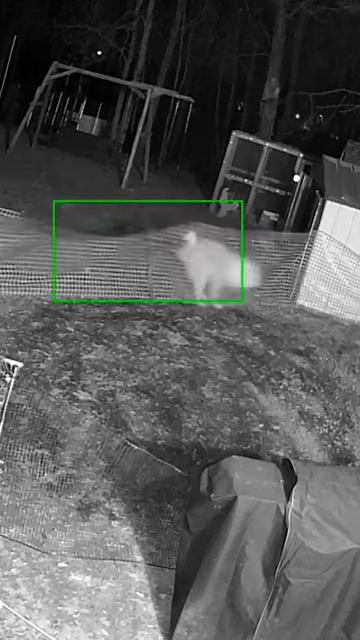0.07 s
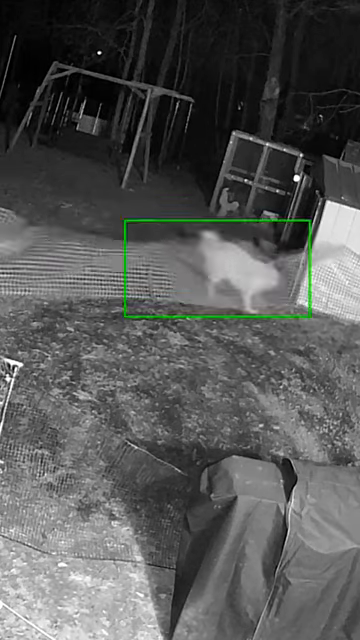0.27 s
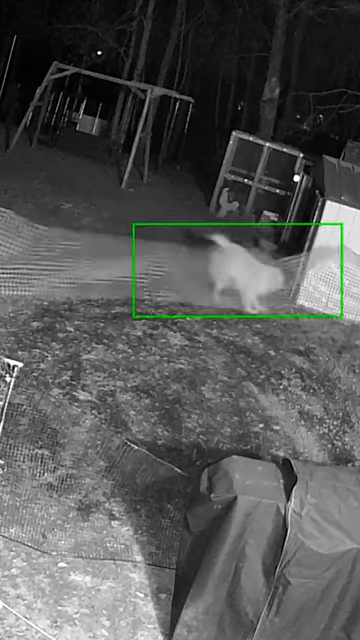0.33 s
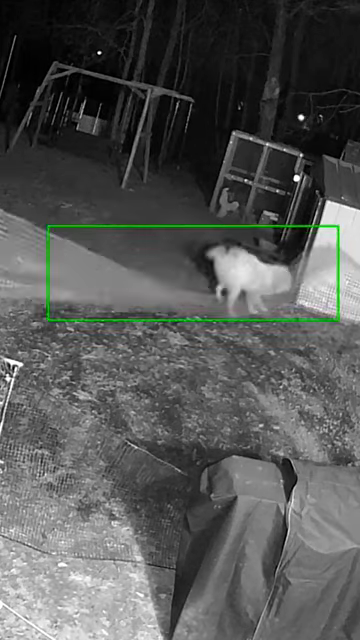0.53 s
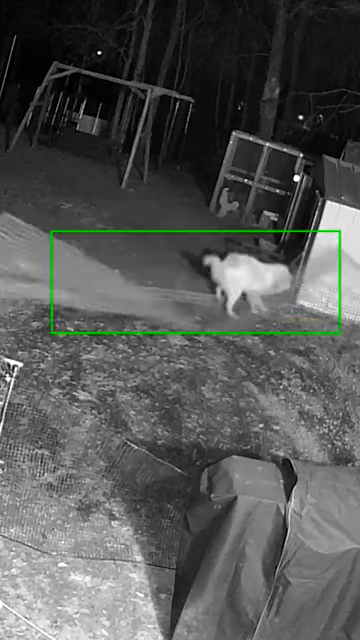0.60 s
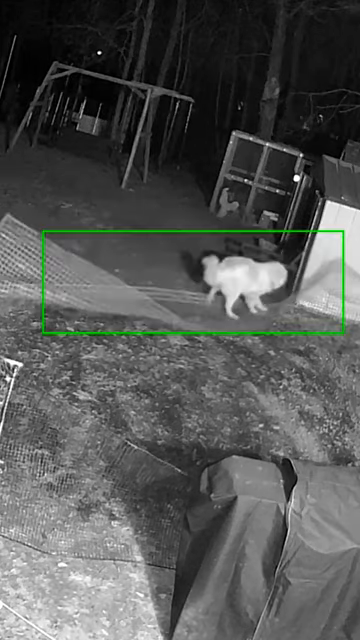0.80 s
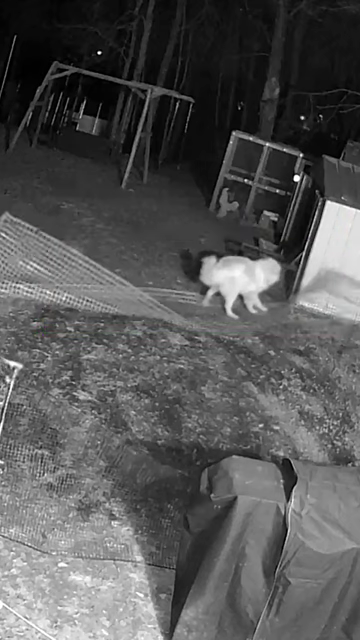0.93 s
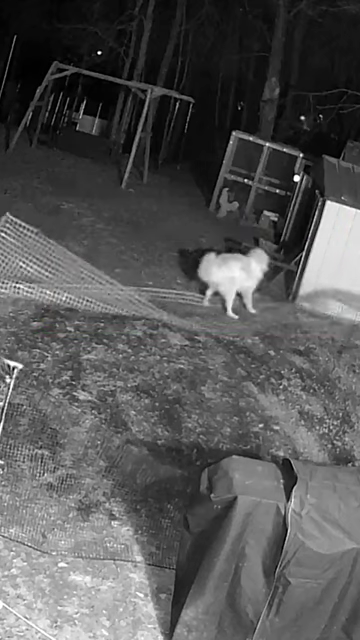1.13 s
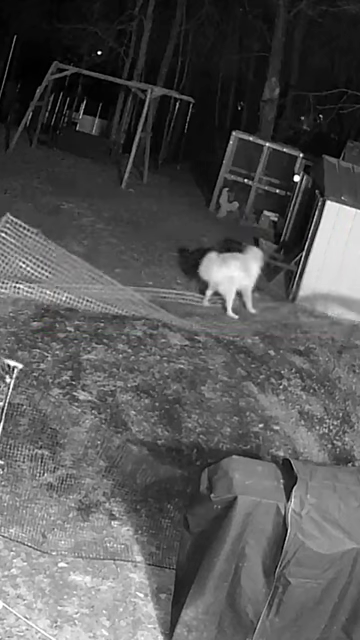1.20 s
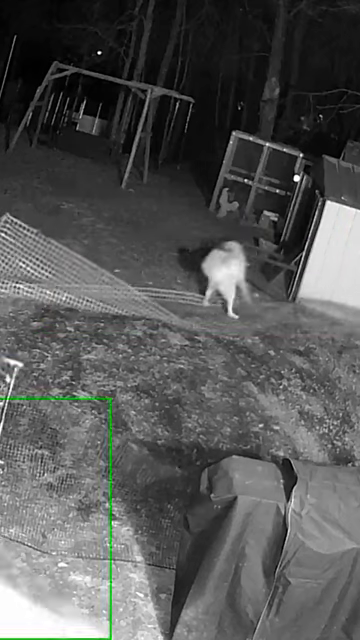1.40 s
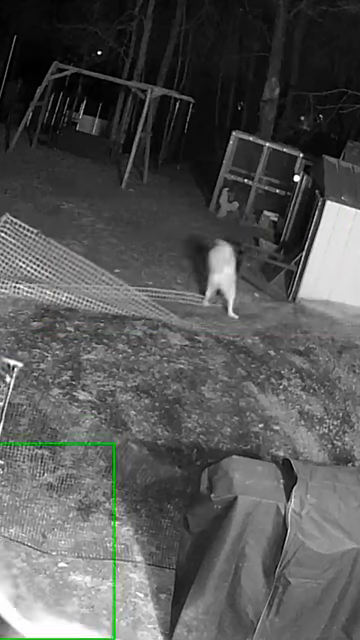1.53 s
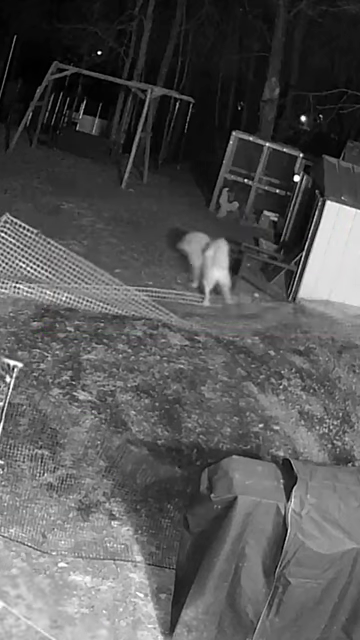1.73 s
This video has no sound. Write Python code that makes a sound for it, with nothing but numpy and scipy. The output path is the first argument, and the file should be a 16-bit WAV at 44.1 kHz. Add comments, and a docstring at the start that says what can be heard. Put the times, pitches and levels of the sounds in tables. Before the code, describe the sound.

Mesh fence booms and rattles twice as a dog hits it, over faint hiss.

```python
"""A large dog crashes twice into a temporary mesh fence in a yard at night.
Each crash is a few dull thumps (damped pulses), a hollow boom (the free vibration of the fence) and a
dense rattle (countless clicks in the mesh) that swells and dies away. The fence rebounds and scrapes,
the trees scatter back a soft echo, and the dog pads off over faint hiss. Nearby surfaces colour all but
the thumps and booms, and a security camera hears the scene through its band-limited microphone."""
import sys
import numpy as np
from scipy import signal
from scipy.fft import rfft, irfft, next_fast_len
from scipy.io import wavfile
from scipy.ndimage import uniform_filter1d, map_coordinates

SR = 44100
rng = np.random.default_rng(int(sys.argv[2]) if len(sys.argv) > 2 else 0)


def bounce(signal):
    """Save signal as a 16-bit WAV file at the path given by the first command-line argument."""
    frames = np.transpose(np.atleast_2d(signal))
    limited = np.clip(frames, -1, 1)
    pcm = np.round(limited * 32767).astype(np.int16)
    wavfile.write(sys.argv[1], SR, pcm)


N = 77175


def thumps():
    """Damped oscillation: each contact drives the fence through a few cycles; slow pushes last longer."""
    # contacts of body and fence (time [s], peak level [dB], frequency [Hz], rise [s])
    contacts = [(.065, -65.5, 340, 0.0088), (.183, -59.5, 383, 0.02), (0.2112, -40, 410, 0.0041),
                (.2225, -21, 435, 0.0025), (0.2416, -34.5, 418, 0.011), (0.5248, -21, 300, 0.0015),
                (.5355, -22.5, 388, 0.0027), (0.5488, -22, 414, 0.0032), (0.681, -29, 400, 0.0016)]
    out = np.zeros(N)
    for start, db, hz, rise in contacts:
        t = since(start)
        envelope = (t / rise) ** 2 * np.exp(2 * (1 - t / rise))
        out -= amp(db) * envelope * np.sin(2 * np.pi * hz * t)
    return out


def boom(start, db, mode_rise_s=0.011, dense_rise_s=0.0036, settle_s=0.25, settle_db_per_s=52):
    """Free vibration: a few clear normal modes stand out of the fence's dense low ringing."""
    # modes of the stretched fence and its wires (frequency [Hz], level [dB], T60 before settling [s])
    fence_modes = [(75.3, -21.5, 2.1), (125, -33.5, 0.38), (213.2, -10.5, 0.57), (294.2, -7.5, 0.59),
                   (375.2, -3.5, 0.26), (419.5, -23, 0.44), (496, -5, 0.67), (641.5, -13, 0.6),
                   (3830, -36, 1.1), (5486, -45, 1.1), (10800, -39, 1.0)]
    # spectrum of the dense ringing (frequency [Hz], level [dB])
    spectrum = [(20, -48), (55, -28), (110, -16.5), (170, -16.5), (260, -8.5), (370, 0), (480, -1.5),
                (620, -6.5), (850, -22), (1400, -33.5), (4000, -67.5)]
    # its decay (frequency [Hz], T60 before settling [s])
    decay_times = [(60, 1.9), (180, 1.6), (350, 1.07), (520, 0.7), (750, 0.91)]
    t = since(start)
    dense = fading(noise(spectrum), t, decay_times) * (1 - np.exp(-t / dense_rise_s))
    modes = np.zeros(N)
    for hz, level, t60 in fence_modes:
        envelope = amp(level + rng.normal(0, 0.5)) * swell(t, mode_rise_s, t60)
        modes += envelope * np.sin(2 * np.pi * (hz * t + rng.random()))
    damping_db = settle_db_per_s * since(start + settle_s)  # the slack fence damps itself as it settles
    return amp(db - damping_db) * (dense + modes)


def rattle(start, db, rise, clicks_per_s=14000, spread_db=1.5, bandwidth_hz=60, fade_after_s=0.062):
    """Impulse excitation: random clicks ring the strands, build up, hold and fade, treble first."""
    # narrow resonances of the strands (frequency [Hz], level [dB])
    resonances = [(1443, 5.5), (1530, -15), (1602, 4.5), (1884, -10), (2138, 0), (2235, 1.5), (2503, 2.5),
                  (2688, 5.5), (2985, 1), (3510, -1), (3756, -6), (4627, -2.5)]
    # broad spectrum of the mesh (frequency [Hz], level [dB])
    spectrum = [(300, -31.5), (700, -5), (1000, -8.5), (1450, -0.5), (2150, -.5), (2600, -6), (3400, -5),
                (4600, -5), (5300, -13.5), (6100, -12.5), (10000, -15.5), (15000, -15)]
    # its decay (frequency [Hz], T60 [s])
    decay_times = [(700, 0.51), (1700, 0.46), (3500, 0.35), (6000, 0.28), (12000, 0.32)]
    clicks = rng.poisson(clicks_per_s / SR, N) * rng.choice([-1, 1], N)
    clicks = clicks * amp(spread_db * rng.standard_normal(N))
    strands = filtered(clicks, lambda hz: sum(amp(level) / (1 + 2j * (hz - centre) / bandwidth_hz)
                                              for centre, level in resonances))
    mesh = unit(coloured(clicks, spectrum) + amp(-12.5) * unit(strands))
    t = since(start)
    build_up = (t > 0) * amp(-13 * (1 - np.minimum(t / rise, 1)))  # the shake spreads through the mesh
    return amp(db) * build_up * fading(mesh, since(start + fade_after_s), decay_times)


def scrapes(half_width_hz=100):
    """Sliding friction: strands of the sagging mesh rub with a thin, narrow-band rasp."""
    # slips of the loose mesh (time [s], level [dB], centre frequency [Hz])
    slips = [(.745, -53.5, 1720), (.80, -57.5, 1500), (0.949, -61.5, 1600), (1.05, -66.5, 1450),
             (1.22, -67, 1340), (1.35, -76, 1400), (1.46, -69, 850), (1.534, -68, 1595)]
    out = np.zeros(N)
    for start, db, centre in slips:
        rasp = filtered(rng.standard_normal(N), lambda hz: 1 / (1 + ((hz - centre) / half_width_hz) ** 2))
        out += amp(db) * swell(since(start), rise=0.011, t60=0.29) * unit(rasp)
    return out


def echo(start, db, return_db=-20.5):
    """Diffuse scattering: the trees return each rattle as a faint, long wash of noise."""
    # scattered spectrum (frequency [Hz], level [dB])
    spectrum = [(200, -5), (450, -9), (700, -4), (1100, -6), (1450, 6.5), (1700, 3.5), (2100, -5.5),
                (3000, -5), (4300, -6), (6500, -10), (14000, -13.5)]
    return amp(db + return_db) * swell(since(start), rise=0.15, t60=1.33) * noise(spectrum)


def paws():
    """Soft impact: each paw scuffs the ground in a short, dull burst of noise."""
    # footfalls (time [s], level [dB])
    steps = [(.005, -67), (.15, -62.5), (1.145, -63), (1.235, -64), (1.54, -64.5), (1.614, -65.5)]
    # spectrum of a scuff (frequency [Hz], level [dB])
    spectrum = [(30, -16.5), (72, 13.5), (120, -23), (400, 8.5), (1000, -4), (1600, -3), (3000, -21.5),
                (12000, -28.5)]
    return sum(amp(db) * swell(since(start), rise=0.0091, t60=0.23) * noise(spectrum)
               for start, db in steps)


def hiss(level_db=-70.5, drift_db=2, drifts_per_s=6, patch_db=2.5):
    """Random modulation: the faint night hiss drifts in level and is patchy in time and frequency."""
    # ambient spectrum (frequency [Hz], level [dB])
    spectrum = [(20, -3), (80, -6.5), (150, -7), (330, -1.5), (700, -1), (1100, -2.5), (1600, -3),
                (3000, -8.5), (5500, -12), (10000, -16), (15000, -29.5)]
    knots = rng.standard_normal(int(N * drifts_per_s / SR) + 4)
    drift = map_coordinates(knots, [np.arange(N) * drifts_per_s / SR])
    frames = signal.stft(noise(spectrum), nperseg=1024)[2]
    patches = uniform_filter1d(rng.standard_normal(frames.shape), size=4, axis=0)
    patches = unit(uniform_filter1d(patches, size=10, axis=1))
    air = signal.istft(frames * amp(patch_db * patches), nperseg=1024)[1][:N]
    return amp(level_db + drift_db * drift) * unit(air)


def walls(x):
    """Comb filtering: early reflections interfere with the direct sound, keeping its average power."""
    # surfaces close to the camera (delay [s], level [dB])
    reflections = [(.00195, -27.5), (.0067, -21.5), (.0113, -12.5), (0.0149, -14.5)]
    power = 1 + sum(amp(db) ** 2 for _, db in reflections)
    combed = filtered(x, lambda hz: 1 + sum(amp(db) * np.exp(-2j * np.pi * hz * delay)
                                            for delay, db in reflections))
    return combed / np.sqrt(power)


def amp(db):
    """Decibels to amplitude ratio."""
    return 10 ** (np.asarray(db) / 20)


def unit(x):
    """Normalisation to rms 1."""
    return x / np.sqrt(np.mean(x ** 2) + 1e-20)


def along(points, hz):
    """Interpolation of (frequency [Hz], value) points on a log frequency axis."""
    frequencies, values = np.transpose(points)
    return np.interp(np.log(hz + 1), np.log(frequencies + 1), values)


def since(start):
    """Seconds since start, zero before it."""
    return np.maximum(np.arange(N) / SR - start, 0)


def filtered(x, response):
    """Linear filtering: the spectrum of x times a frequency response."""
    size = next_fast_len(N + SR // 2)
    return irfft(rfft(x, size) * response(np.fft.rfftfreq(size, 1 / SR)), size)[:N]


def coloured(x, spectrum):
    """Spectral shaping of x, at rms 1."""
    return unit(filtered(x, lambda hz: amp(along(spectrum, hz))))


def noise(spectrum):
    """Coloured Gaussian noise of rms 1."""
    return coloured(rng.standard_normal(N), spectrum)


def fading(x, age, t60s):
    """Frequency-dependent damping: overlapping bands of x each decay at their own rate."""
    shares = np.eye(len(t60s))
    centres = [hz for hz, _ in t60s]
    return sum(filtered(x, lambda hz: along(list(zip(centres, share)), hz)) * amp(-60 * age / t60)
               for share, (_, t60) in zip(shares, t60s))


def swell(t, rise, t60):
    """Exponential attack and decay; rise and t60 are in seconds."""
    return (1 - np.exp(-t / rise)) * np.exp(-np.log(1000) * t / t60)


def scene():
    """Superposition: the fence, its echo, the steps and the night hiss add in one channel."""
    # jolts of the fence: a light touch, two crashes, two rebounds
    # (time [s], boom level [dB], rattle level [dB], rattle rise [s])
    jolts = [(0.2098, -66, -48.5, 0.011), (.2205, -31.5, -30, 0.034), (.5245, -31, -28, 0.022),
             (.668, -40, -59, 0.0086), (.822, -57.5, -66, 0.0076)]
    low = thumps() + sum(boom(start, db) for start, db, _, _ in jolts)
    bright = scrapes() + sum(rattle(start, db, rise) + echo(start, db) for start, _, db, rise in jolts)
    return (low + walls(bright + paws() + hiss()))[None]


def record(dry, circuit_db=-81.5, cutoff_hz=15550):
    """Transduction: the camera adds a deep notch near 8 kHz, faint circuit noise and a hard band limit."""
    # microphone response (frequency [Hz], gain [dB])
    microphone = [(6400, 0), (6750, -9.5), (7050, -26), (8900, -26.5), (9400, -8.5), (10000, -5),
                  (10700, -10), (11600, -6), (13500, -15.5), (15400, -27.5)]
    # spectrum of the circuit noise (frequency [Hz], level [dB])
    circuit = [(6500, 7), (7200, 5), (8200, 1.5), (10500, -0.5), (12500, -18), (15000, -17)]
    heard = filtered(dry[0], lambda hz: amp(along(microphone, hz))) + amp(circuit_db) * noise(circuit)
    return filtered(heard, lambda hz: hz < cutoff_hz)[None]


dry = scene()
out = record(dry)
bounce(out)
```